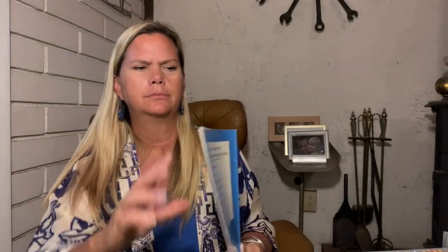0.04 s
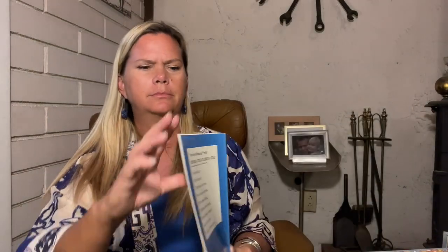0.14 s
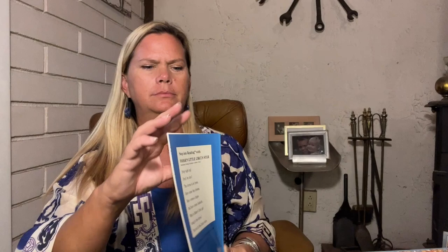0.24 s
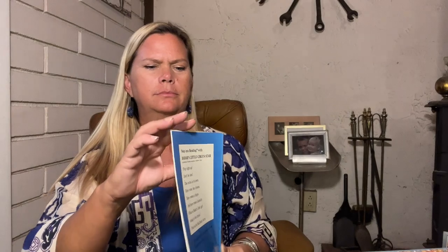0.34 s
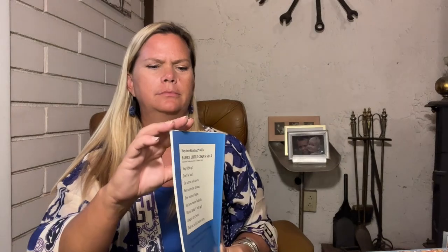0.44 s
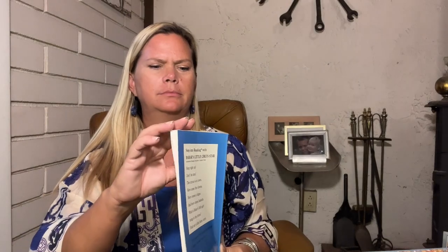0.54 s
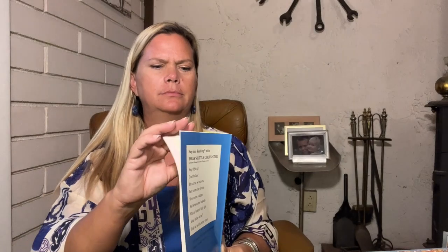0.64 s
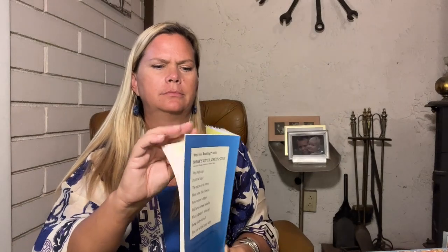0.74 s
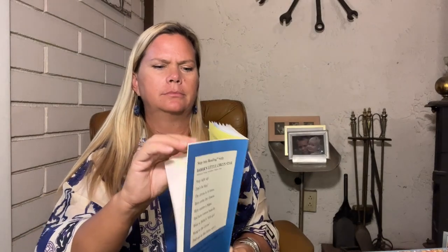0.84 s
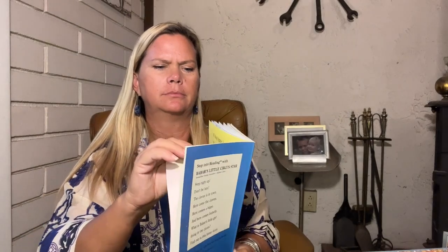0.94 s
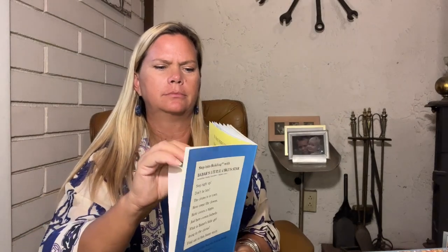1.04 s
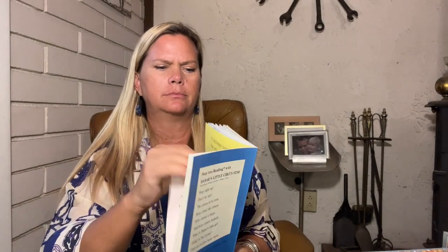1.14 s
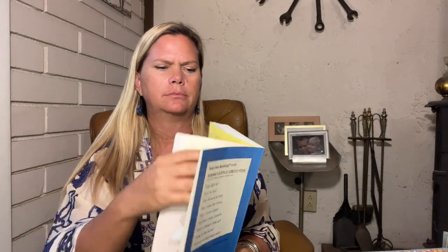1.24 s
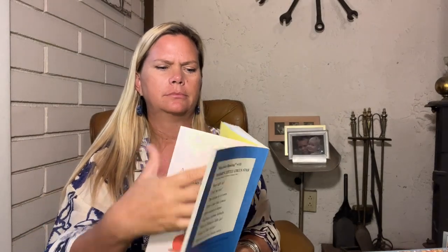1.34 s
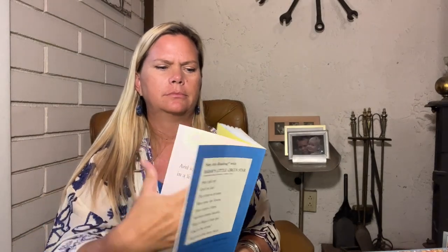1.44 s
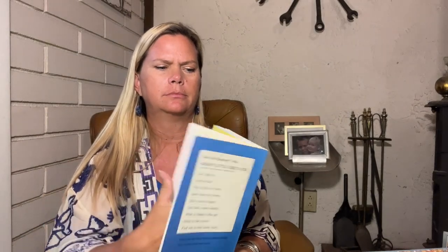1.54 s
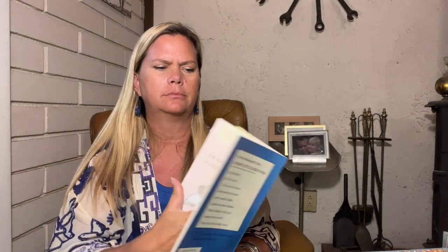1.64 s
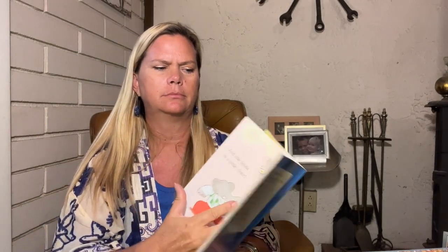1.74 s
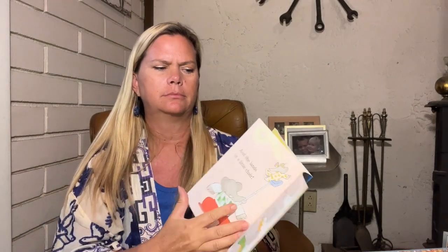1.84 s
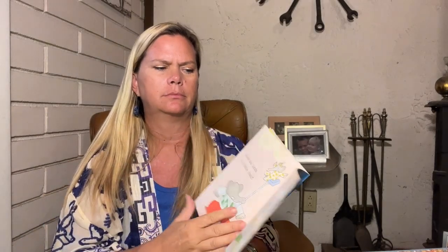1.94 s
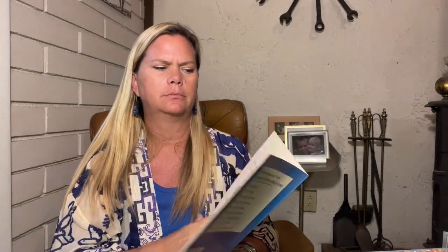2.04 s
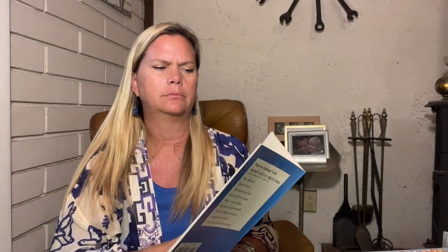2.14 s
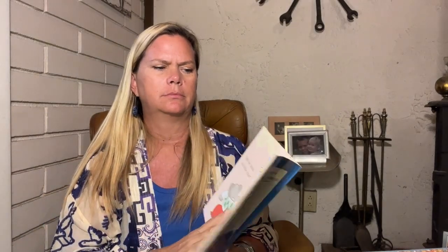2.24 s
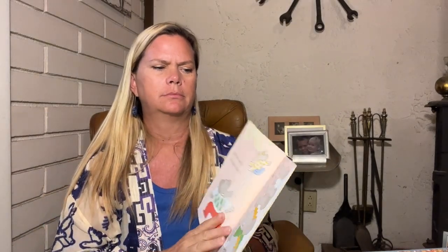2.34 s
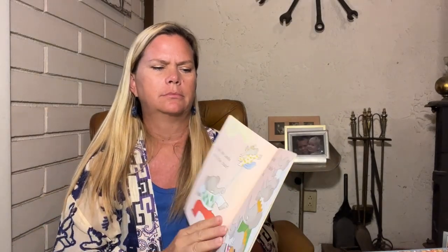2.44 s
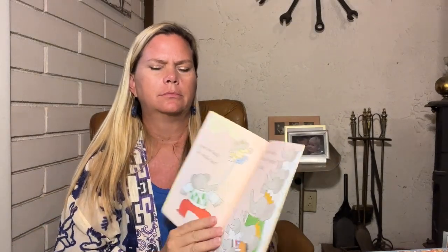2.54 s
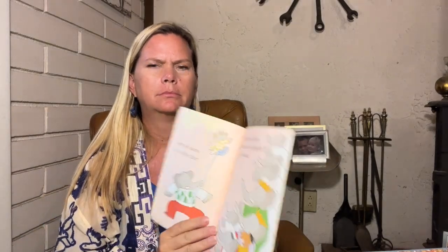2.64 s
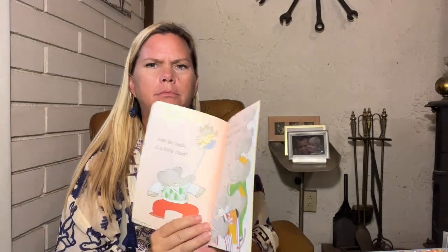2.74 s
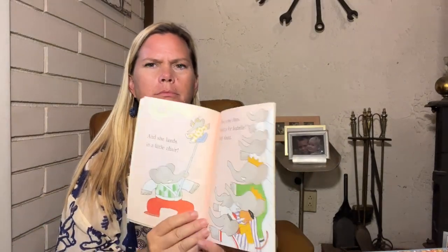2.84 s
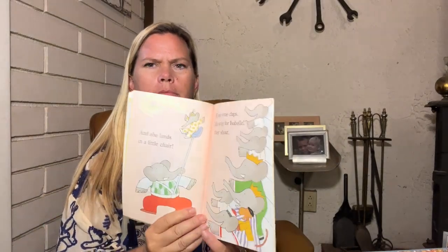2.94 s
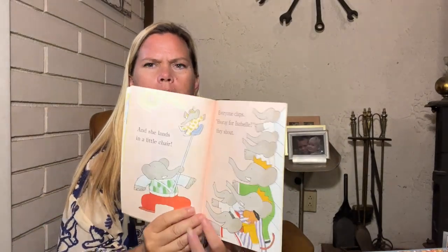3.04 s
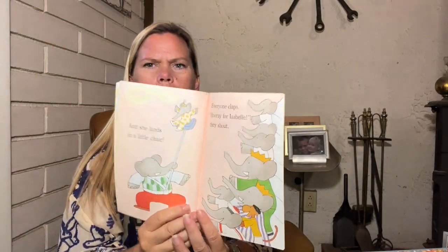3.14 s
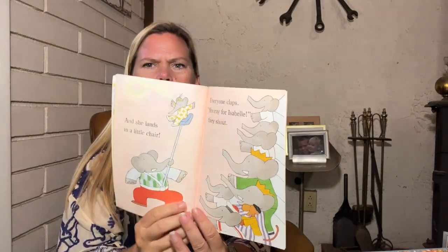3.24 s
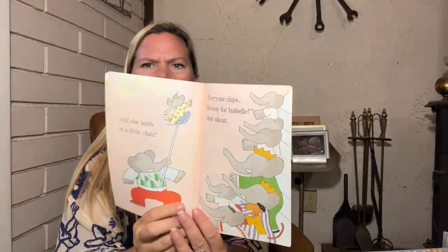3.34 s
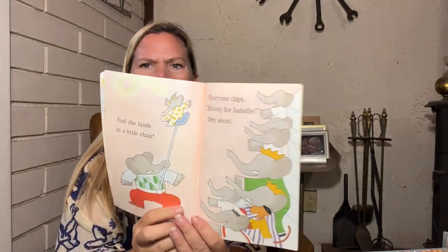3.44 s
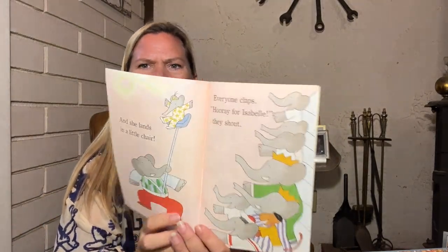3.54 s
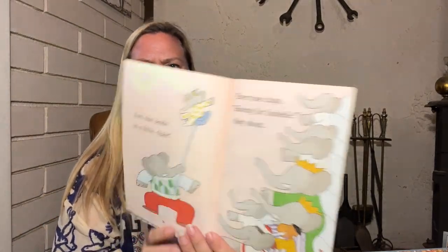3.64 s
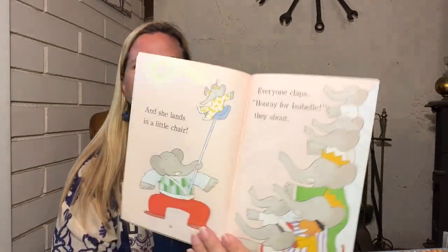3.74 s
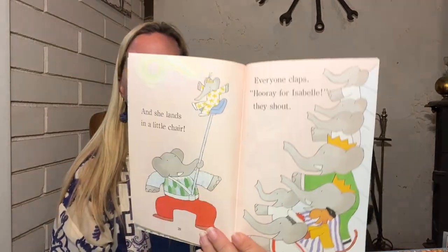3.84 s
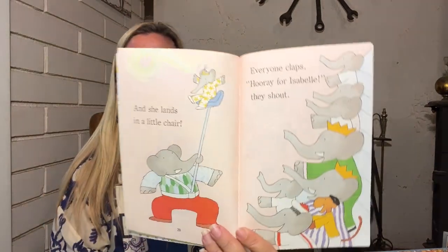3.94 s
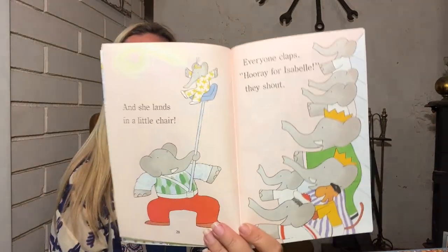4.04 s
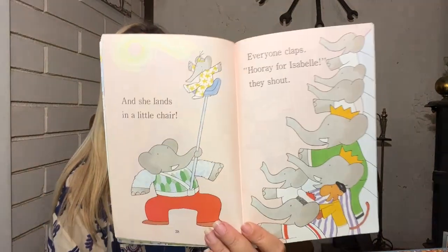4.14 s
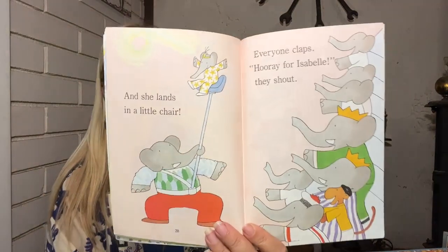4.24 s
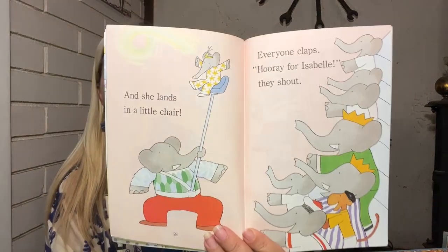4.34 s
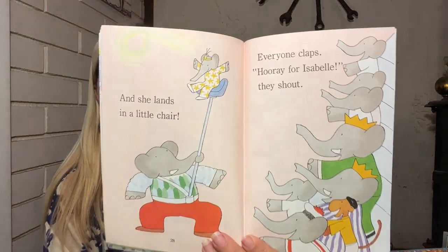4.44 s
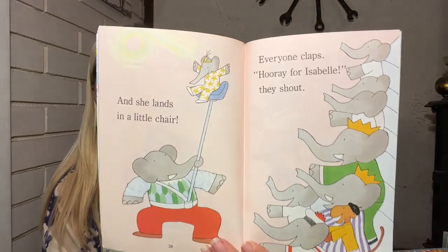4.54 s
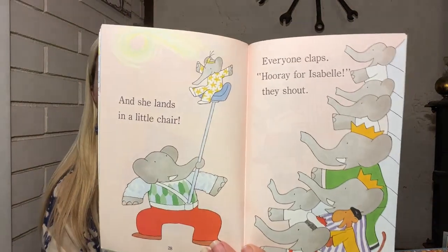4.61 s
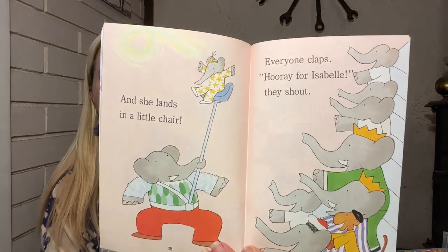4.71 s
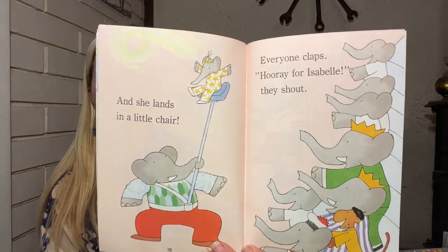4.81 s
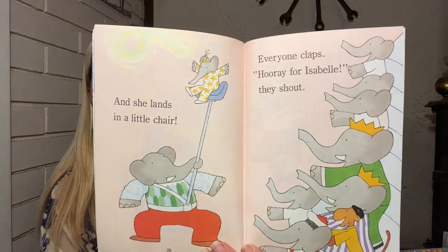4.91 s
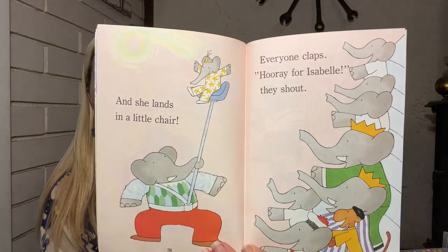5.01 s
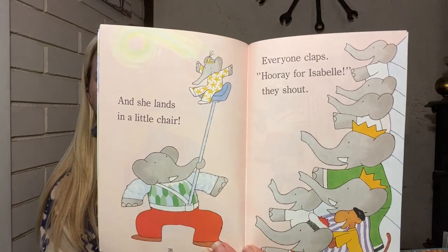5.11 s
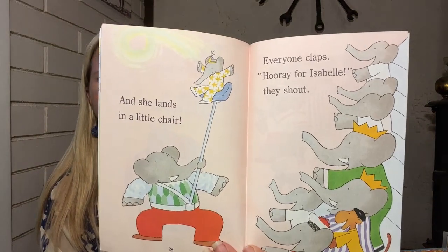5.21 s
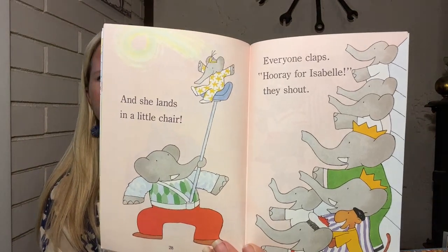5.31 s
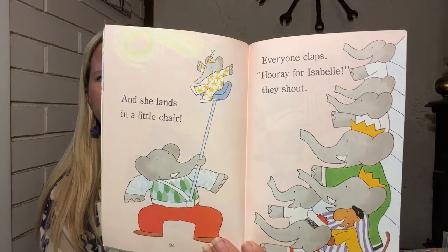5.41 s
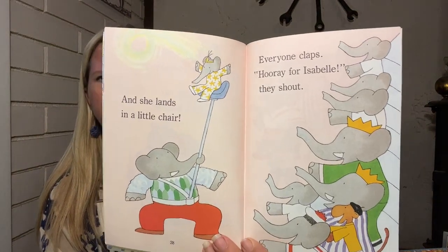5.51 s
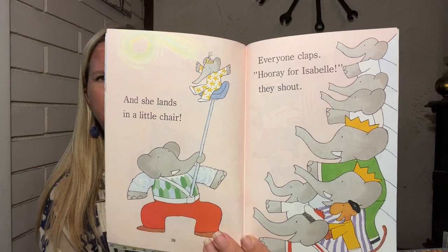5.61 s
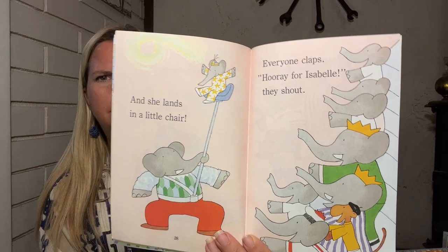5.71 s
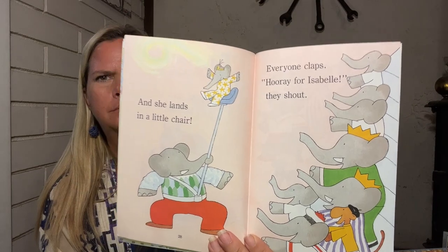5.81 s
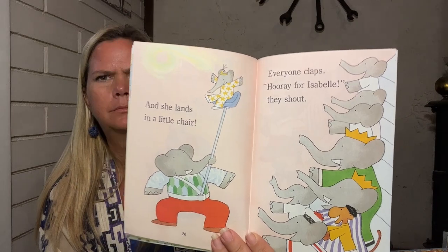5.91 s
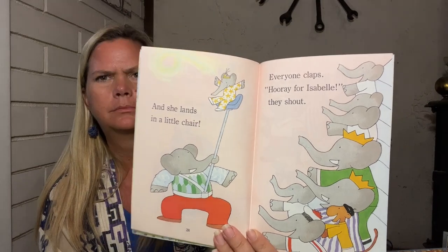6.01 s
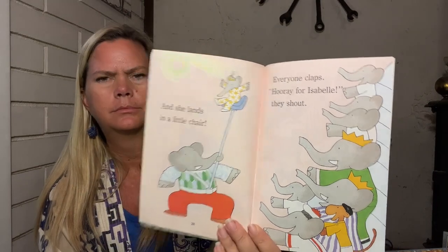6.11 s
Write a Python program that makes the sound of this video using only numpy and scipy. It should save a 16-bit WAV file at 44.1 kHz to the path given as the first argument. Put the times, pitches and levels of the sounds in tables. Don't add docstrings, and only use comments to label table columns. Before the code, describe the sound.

A quiet small room with low ventilation wash, wavering faint hum and slowly swelling deep bass throughout. At the very start a barely audible thin bracelet ring fades. From 0.2 to 0.5 s a thumb lightly scuffs page edges with small ticks; a sharper flick comes at 0.6 and another riffle near 0.8. A page lifts with a growing rustle and thin airy whistles, then snaps free at 1.14 s, the loudest, crisp crack with a papery flap. Palm hiss and small buckles trail to 1.5. A soft lull, then a crease tick at 2.04 and pressing rustle around 2.2. Glossy slides and bright grazes follow at 2.6-2.7, light flicks around 2.9-3.1, and a final smoothing slide ends with a small snap at 3.67. Afterward the book is held: tiny fingertip creeps near 4.8-5.0 and 5.4-5.5, an extremely faint distant insect, and room tone until just past 6 s.

```python
import sys
import numpy as np
from scipy import signal
from scipy.fft import rfft, irfft
from scipy.io import wavfile
from scipy.ndimage import uniform_filter1d

SR = 44100
rng = np.random.default_rng(int(sys.argv[2]) if len(sys.argv) > 2 else 0)


def wav_out(sig):
    wavfile.write(sys.argv[1], SR, np.round(np.clip(np.atleast_2d(sig).T, -1, 1) * 32767).astype(np.int16))


def voltage_ratio(decibels):
    exponent = np.asarray(decibels, float) / 20
    return 10 ** exponent


N = 272097

# start in seconds, level in dB, pitch of the patch in Hz, spread in octaves, ring as a factor.
RELEASE = [
    (1.135, -27, 2200, 0.29, 1),
    (1.138, -17, 2700, .8, .3),
    (1.1389, -17, 3100, .7, .35),
    (1.1394, -16.5, 1900, .8, .45),
    (1.1413, -25.5, 365, 0.22, 0.43),
    (1.143, -26, 1900, 0.64, 0.33),
    (1.143, -31.5, 890, 0.16, 0.5),
    (1.1726, -32, 2500, .8, 0.44),
    (1.171, -36, 375, 0.17, 0.55),
    (1.177, -40, 2320, 0.24, 0.86),
]


def evened(x):
    return x / np.sqrt(np.mean(x ** 2) + 1e-20)


def read(points, hz):
    f, value = np.transpose(points)
    return np.interp(np.log(hz + 1), np.log(f + 1), value)


def add(mix, s, sound):
    part = mix[..., round(s * SR):][..., :sound.shape[-1]]
    part += sound[..., :part.shape[-1]]


def resonate(x, hz, width):
    turn = np.exp(2j * np.pi * np.cumsum(hz * np.ones(len(x))) / SR)
    r = np.exp(-np.pi * width / SR)
    smooth = signal.lfilter([1 - r], [1, -r], x / turn + 1e-18)
    return 2 * (turn * smooth).real


def noise_pair(gain, same, lag, size):
    hz = np.fft.rfftfreq(size, 1 / SR)
    a, b, c, d = rng.standard_normal((4,) + gain.shape)
    same = np.clip(read(same, hz), -1, 1)
    right = a + 1j * b
    left = same * right * np.exp(-1j * read(lag, hz)) + np.sqrt(1 - same ** 2) * (c + 1j * d)
    z = np.array([left, right]) * gain
    return signal.istft(z.transpose(0, 2, 1), nperseg=size, noverlap=size - size // 4)[1][:, :N]


def patches(shape, frames, bins):
    field = rng.standard_normal(shape)
    field = uniform_filter1d(field, int(frames), 0)
    return evened(uniform_filter1d(field, int(bins), 1))


def hum():
    # frequency in Hz, width in Hz, level in dB.
    tones = [(117.8, 15.5, -61.5), (181.1, 6, -68.5), (243, 5.3, -66.5), (3440, 360, -90)]
    out = np.zeros(N)
    for hz, width, db in tones:
        once = resonate(rng.standard_normal(N), hz, width)
        out += voltage_ratio(db) * evened(resonate(once, hz, width))
    return out


def room_tone():
    # frequency in Hz, density in dB per Hz.
    spectrum = [(25, -10), (33, -25), (44, -0.5), (55, 3), (90, -10), (200, -7.5), (420, -8), (520, -16),
                (1000, -20.5), (1400, -27.5), (2200, -31.5), (4000, -46.5), (5500, -48.5), (8500, -54.5),
                (10000, -57.5), (14000, -51.5)]
    # time in seconds, level in dB.
    rumble = [(0, -6.5), (2.1, -1.5), (2.7, 3), (3.599, 2), (4.2, -5), (4.9, 5.5), (5.6, 0.5), (6.2, -3)]
    # frequency in Hz, left-right likeness from -1 to 1.
    likeness = [(60, 1), (150, 0.55), (380, 0.33), (950, -0.16), (2380, -0.17), (5980, -0.22),
                (15000, -0.074)]
    hz = np.fft.rfftfreq(2048, 1 / SR)
    shape = (N // 512 + 5, len(hz))
    field_db = read(spectrum, hz) - 60 * (hz > 14280)
    field_db = field_db + 1.77 * patches(shape, 8.9, 6.6) + 0.25 * patches(shape, 6.1, 680)
    swell_db = np.interp(np.arange(shape[0]) * 512 / SR, *np.transpose(rumble))
    field_db += swell_db[:, None] / (1 + (hz / 75) ** 4)
    wash = evened(noise_pair(voltage_ratio(field_db), likeness, [(1, 0.0015), (2, 0.012)], size=2048))
    return (voltage_ratio(-51.5) * wash + hum()) * voltage_ratio([[-.4], [.4]])


def whistle(rows, width, upper_db):
    swell_s, sag_db = 0.013, -6
    out = np.zeros(N)
    for s, length, from_hz, to_hz, db in rows:
        t = np.arange(0, length, 1 / SR)
        air = rng.standard_normal(len(t))
        hz = from_hz + (to_hz - from_hz) * np.sin(np.pi / 2 * t / length)
        tone = evened(resonate(air, hz, width))
        octave = 2.0 * hz * (hz < SR / 5)
        tone += voltage_ratio(upper_db) * evened(resonate(air, octave, width))
        swell = np.minimum(np.minimum(t, length - t) / swell_s, 1)
        add(out, s, tone * swell * voltage_ratio(db + sag_db * t / length))
    return out


def insect():
    # start in seconds, length in seconds, first pitch in Hz, last pitch in Hz, level in dB.
    chirrs = [
        (3.9, 2.3, 5030, 5050, -96),
        (4.5, .14, 5000, 5000, -89),
        (5.0, .17, 5070, 5080, -86),
    ]
    return whistle(chirrs, 70, -60)


def bracelet():
    # start in seconds, length in seconds, first pitch in Hz, last pitch in Hz, level in dB.
    rings = [
        (.01, .11, 11900, 11400, -81),
        (5.51, .04, 12080, 12000, -88),
    ]
    return whistle(rings, 60, -62)


def air_pockets():
    # start in seconds, length in seconds, first pitch in Hz, last pitch in Hz, level in dB.
    pockets = [(.415, 0.067, 1890, 1880, -73), (.99, 0.14, 3120, 3420, -57.5),
               (1.02, 0.101, 4150, 4350, -58.5), (2.69, .035, 1450, 1490, -57.5),
               (1.04, 0.11, 1450, 1350, -59), (1.225, 0.12, 1480, 1800, -51.5),
               (1.275, 0.051, 3900, 4130, -61), (1.16, 0.033, 3950, 3970, -52),
               (2.148, 0.027, 1740, 1830, -54), (2.21, .035, 2470, 2500, -49),
               (2.26, 0.04, 2400, 2340, -60), (3.525, 0.1, 1300, 1340, -56)]
    return whistle(pockets, 75, -29.0)


def hand(t):
    # peak in seconds, pressure in dB, rise in seconds, fall in seconds, sheet body in dB.
    thumb = [
        (.17, -78, 0.036, 0.46, -3),
        (.35, -61, 0.13, 0.1, -9),
        (.51, -69.5, 0.56, 0.53, 0),
        (.597, -45.5, 0.026, 0.026, -3.5),
        (.762, -58.5, 0.31, 0.26, -4),
        (.94, -56, 0.19, 0.028, -4.5),
        (.64, -63, 0.11, 0.38, 0),
    ]
    sweep = [
        (.848, -52.5, 0.078, 0.13, -4),
        (1.015, -58.5, 0.053, 0.88, -4),
        (1.06, -56, 0.13, 0.66, -2),
        (1.11, -55, 0.32, 0.51, -1),
        (1.144, -40, 0.026, 0.071, 3.5),
        (5.51, -79.5, 0.2, 0.27, 10.5),
    ]
    palm = [(1.17, -48.5, .04, 0.26, 7.5), (1.31, -57.5, 0.72, 0.12, 7.5), (1.508, -54.5, 0.25, 0.15, -3),
            (1.74, -64.5, 1, 0.52, -9.5), (2.28, -56, .2, 0.34, -4.5), (2.355, -60.5, .3, 0.068, -1),
            (1.62, -62, 0.26, 0.3, 4), (2.78, -76, .05, 0.22, 9), (2.935, -77.5, .02, 0.29, 8),
            (3.7, -70, 0.024, 0.16, 10.5), (3.85, -108.5, .1, 0.32, 26)]
    spread = [
        (2.12, -66.5, 2.2, 0.34, 3.5),
        (2.186, -48.5, 0.065, 0.17, 3.5),
        (2.228, -49, .06, 0.15, -3.5),
        (2.71, -57.5, 0.23, 0.12, 0),
        (3.5, -57.5, 0.16, 0.4, -3.5),
    ]
    gloss = [
        (2.633, -48, 0.17, 0.12, -5),
        (3.2, -69, 0.16, 0.37, 1),
        (3.283, -62, 0.26, 0.46, -3.5),
        (3.67, -55, 0.27, 0.034, -0.5),
    ]
    flick = [
        (2.9, -57, 0.038, 0.034, -2.5),
        (3.059, -62, 0.02, 0.028, -4),
        (3.105, -70.5, 0.044, 0.054, 4),
    ]
    shine = [
        (2.635, -51, 0.024, 0.025, -18),
        (3.625, -56.5, 0.056, 0.046, -11),
    ]
    press = [
        (2.5, -51, 0.17, 0.3, -5.5),
        (3.57, -47.5, 0.13, 0.081, -8),
    ]
    grip = [
        (4.79, -77, 0.12, 0.086, 4.5),
        (5.43, -79, 0.047, 0.074, 9.1),
    ]
    hold = [(3.78, -84, .1, .3, -5), (3.95, -87, .1, .15, -5), (4.15, -85, .2, .3, -5),
            (4.5, -88, .08, .1, -5), (4.77, -84, .1, .12, -5), (4.89, -87, .1, .1, -5),
            (5.36, -89, .08, .08, -5), (5.49, -88, .08, .1, -5), (5.8, -90, .1, .1, -5),
            (6.13, -89, .1, .1, -5)]
    # strokes, air-gap resonance in Hz, its level in dB, sheen in dB,
    # roundness of the stroke (1 pointed, 3 flat-topped).
    contacts = [(thumb, 5900, 0.93, -12, 0.97), (sweep, 5900, 5.1, -12, 0.88), (palm, 7000, 4.1, .8, 0.96),
                (spread, 6100, -0.38, -6, 0.74), (gloss, 7300, .6, -4.5, 1.3), (flick, 6800, 12.4, 5, 2.4),
                (shine, 7000, 1.5, 12, 2), (press, 6800, 8.5, -5, 1.06), (grip, 6000, 17, -11, 2.9),
                (hold, 6200, 1.5, 4.7, 1.1)]
    drop_db = 29.5
    power, colour = [], []
    for strokes, gap_hz, gap_db, sheen_db, roundness in contacts:
        for s, db, rise, fall, body_db in strokes:
            away = abs(t - s) / np.where(t < s, rise, fall)
            stroke_db = np.maximum(db - drop_db * away ** roundness, -200)
            power.append(voltage_ratio(stroke_db) ** 2)
            colour.append((body_db, gap_hz, gap_db, sheen_db))
    total = np.sum(power, 0)
    return (10 * np.log10(total), *(np.transpose(colour) @ (power / total)))


def crackle():
    s, t = np.arange(0, N, 64) / SR, np.arange(N) / SR
    level_db, body_db = (np.interp(t, s, curve) for curve in hand(s)[:2])
    ticks = (rng.random(N) < 420 / SR) * voltage_ratio(2.9 * np.minimum(rng.exponential(1, N), 2.4))
    place = rng.integers(0, 12, N)
    u, out = np.arange(300) / SR, np.zeros(N)
    for k, hz in enumerate(np.geomspace(900, 8000, 12)):
        grain = np.sin(2 * np.pi * hz * u) * np.exp(-u * hz / 1.8)
        tilt_db = body_db * (hz < 3900)
        out += signal.oaconvolve(ticks * (place == k) * voltage_ratio(tilt_db), grain)[:N]
    return out * voltage_ratio(np.minimum(level_db, -54) + 1.0)


def sliding():
    # frequency in Hz, level in dB.
    paper = [(300, -16), (700, -5), (1200, 0), (2500, 0), (3600, -1), (4600, 0), (9000, 0), (11000, 0),
             (14000, -1), (15000, -5), (16000, -4)]
    # frequency in Hz, left-right likeness from -1 to 1.
    likeness = [(300, 1), (1500, 0.57), (4000, 0.24), (8000, 0.25), (11000, 0.95), (15000, 0.64)]
    # frequency in Hz, lag of the left port in radians.
    port_lag = [(300, 0), (1800, .25), (3000, .9), (4500, 1.4), (6000, 2.1), (7500, 4.3), (9300, 3.2),
                (13000, 3.2), (15500, 5.6)]
    hz = np.fft.rfftfreq(256, 1 / SR)
    t = np.arange(N // 64 + 5) * 64 / SR
    level_db, body_db, gap_hz, gap_db, sheen_db = (curve[:, None] for curve in hand(t))
    bump = np.exp(-.5 * ((hz - gap_hz) / 480) ** 2)
    bump += 0.23 * np.exp(-.5 * ((hz - 2 * gap_hz) / 700) ** 2)
    field_db = read(paper, hz) + gap_db * bump
    field_db = field_db + (body_db + 3.5) / (1 + (hz / 3900) ** 6)
    field_db = field_db + (sheen_db + 1.5) / (1 + (9300 / (hz + 1)) ** 8)
    band = (hz > 4500) & (hz < 9000)
    gain = voltage_ratio(field_db) / np.sqrt((voltage_ratio(field_db[:, band]) ** 2).sum(1, keepdims=True))
    grain_db = 1.93 * patches(gain.shape, 13, 4.4) + 0.51 * patches(gain.shape, 3.7, 130)
    grain_db += 0.23 * patches(gain.shape, 25, 200)
    grain_db += 1.66 * patches(gain.shape, 45, 2)
    return noise_pair(gain * voltage_ratio(level_db + grain_db + 0.5), likeness, port_lag, size=256)


def snaps():
    # start in seconds, level in dB, pitch of the patch in Hz,
    # spread in octaves, ring as a factor.
    buckles = [(.501, -41, 1100, 0.45, 0.53), (.504, -42, 1300, 1.1, .4), (.7615, -44, 1400, 0.28, .6),
               (1.19, -38, 1500, 0.9, 0.46), (1.228, -41, 2500, .8, 0.42), (1.243, -39, 1700, .6, 0.55),
               (.6, -32, 2840, 0.95, 0.67), (0.762, -34, 2600, 0.56, 0.58), (.8, -60, 1900, .15, 2.3),
               (1.268, -35, 600, 0.55, 0.98), (1.312, -42, 850, 0.58, 0.93),
               (1.508, -42.5, 1610, 0.37, 1.3), (2.0411, -35, 1500, 0.63, 0.44),
               (2.0415, -40.5, 1300, .3, 0.49), (2.046, -53.5, 2200, 0.61, 2.7),
               (2.101, -47, 420, 0.61, .7), (2.182, -42, 3500, 1.3, .3), (2.185, -46, 1120, 0.16, 0.9),
               (2.191, -40, 1150, .4, 0.65), (2.188, -52, 2600, 0.37, .6), (.296, -47, 3000, 1.1, .3),
               (.328, -44, 3000, 1.2, 0.32), (.379, -52, 3200, .6, .4), (.594, -48, 3500, 1.1, .4),
               (0.839, -48, 3500, .8, .5), (2.66, -43, 2500, 1.2, 0.28), (2.582, -45, 2500, 1.2, .3),
               (2.201, -38, 2500, 0.3, 0.52), (2.232, -46, 2500, 0.3, 1.4), (2.65, -45, 1180, 0.11, 1.1),
               (2.705, -48, 1444, 0.38, 1.2), (3.529, -54, 1300, 0.24, 1.2), (3.666, -41, 1300, 0.27, 0.46),
               (3.673, -34.5, 1300, 0.54, 0.42)]
    # frequency in Hz, level in dB, time to fall 60 dB in seconds.
    sheet = [(355, -13, 0.045), (495, -5.5, 0.033), (905, -8.5, 0.074), (1120, -10, 0.043),
             (1403, 1, 0.033), (1617, -7, 0.036), (1990, -8, 0.068), (2465, -7.5, 0.06), (3200, 5, 0.018),
             (3600, -10, 0.0088), (4055, 9.5, 0.01), (4840, 11, 0.009), (5500, -5, 0.0088),
             (7000, -15, 0.0053)]
    out, t = np.zeros(N), np.arange(2500) / SR
    hz, mode_db, t60 = np.transpose(sheet)[:, :, None]
    for s, db, patch_hz, spread, ring in [*RELEASE, *buckles]:
        delay, detune = rng.random((2, len(sheet), 1))
        since = np.maximum(t - 0.00019 * delay, 0)
        near = np.exp(-.5 * (np.log2(hz / patch_hz) / spread) ** 2)
        modes = np.sin(2 * np.pi * hz * (.985 + .03 * detune) * since)
        sound = (modes * near * voltage_ratio(mode_db - 60 * since / (t60 * ring))).sum(0)
        add(out, s, voltage_ratio(db) * sound / abs(sound).max())
    return out


def scuffs():
    # time in seconds, level in dB, resonance in Hz,
    # length in seconds, sheet body in dB.
    skips = [(0.169, -65, 6850, 0.0022, 13), (0.228, -54.5, 7100, .002, 2.5),
             (0.296, -40.5, 6400, 0.0038, -7), (0.329, -31, 6400, 0.00078, -15),
             (0.335, -45, 6700, 0.00097, 2), (0.351, -55, 6800, 0.0029, 11), (.38, -41, 6460, 0.0047, -1.5),
             (0.503, -41.5, 8140, 0.0039, 2), (.54, -54, 8000, .0015, -8), (0.569, -45, 7500, 0.0035, -11),
             (0.599, -34, 8800, 0.0025, 4), (0.841, -46, 7000, 0.017, 6), (1.169, -25, 7700, .002, -4),
             (1.507, -40.5, 5600, 0.011, -14), (2.19, -45, 5000, 0.0036, -14),
             (2.617, -29.5, 7000, 0.0057, -15), (2.641, -35, 6660, 0.006, 0), (2.86, -60, 6700, .002, -2),
             (3.062, -51, 6800, 0.0042, -14), (3.669, -36, 7700, 0.0023, -3), (3.67, -54, 8000, 0.00049, 2)]
    # time in seconds, level in dB, resonance in Hz, length in seconds.
    creeps = [
        (4.768, -56, 8800, .003),
        (4.83, -55, 6100, 0.0033),
        (4.881, -70, 11000, .001),
        (4.963, -58, 13100, .012),
        (4.996, -72, 12500, .001),
        (5.387, -59, 6200, .002),
        (5.42, -57, 6200, .003),
        (5.442, -63, 6400, 0.0023),
        (5.495, -54.5, 5930, .002),
    ]
    free_s = RELEASE[0][0]
    rows = [(*row, -3.5 if row[0] > free_s else -4) for row in skips]
    rows += [(*row, -18, -12) for row in creeps]
    out, t = np.zeros(N), np.arange(-1200, 1800) / SR
    for s, db, hz, length, body_db, sheen_db in rows:
        shape = np.exp(-(t / length / (0.94 + 0.82 * (t > 0))) ** 2)
        puff = rng.standard_normal(3000) * shape
        sound = 2 * resonate(resonate(puff, hz, 1750), hz, 1800)
        sound += voltage_ratio(sheen_db) * resonate(resonate(puff, 13000, 7000), 13000, 7000)
        body = resonate(puff, hz / 2, 700) + 0.3 * resonate(puff, 1500, 1600)
        sound += voltage_ratio(body_db + 8.0) * body
        add(out, s + t[0], voltage_ratio(db - 12.0) * sound)
    return out


def to_ports(x):
    # frequency in Hz, lag of the left port in radians.
    edge_lag = [(300, 0), (3000, .8), (7600, 1.7), (9600, 3.0), (13000, 3.2), (15500, 5.6)]
    fade = voltage_ratio(-60 * np.arange(3000) / SR / .06 - 31)
    taps = rng.standard_normal((2, 3000)) * (rng.random((2, 3000)) < .3) * fade
    taps[:, :30] = 0
    x = signal.sosfilt(signal.butter(2, 260, 'high', fs=SR, output='sos'), x)
    lag = read(edge_lag, np.fft.rfftfreq(N, 1 / SR))
    late = irfft(rfft(x) * np.exp(-1j * lag), N)
    return np.array([late, x]) + signal.oaconvolve(x[None], taps, axes=1)[:, :N]


def scene():
    points = insect() + bracelet() + air_pockets() + crackle() + snaps() + scuffs()
    return room_tone() + sliding() + to_ports(points)


def low_pass(x):
    return signal.sosfilt(signal.butter(12, 16450, fs=SR, output="sos"), x)


def record(dry):
    mix = signal.sosfilt(signal.butter(6, 37, 'high', fs=SR, output='sos'), dry)
    return low_pass(mix)


dry = scene()
out = record(dry)
wav_out(out)
```